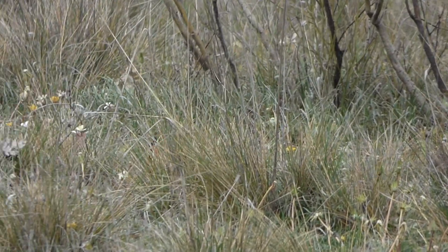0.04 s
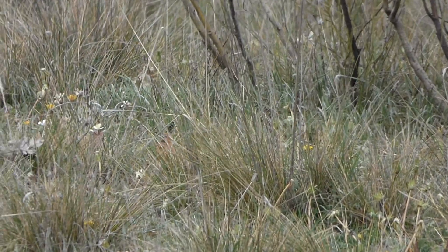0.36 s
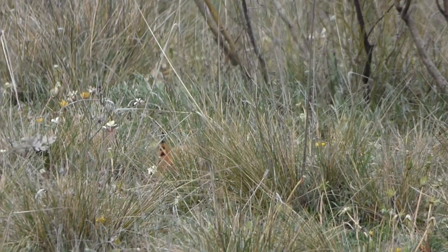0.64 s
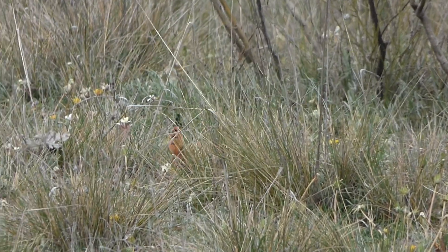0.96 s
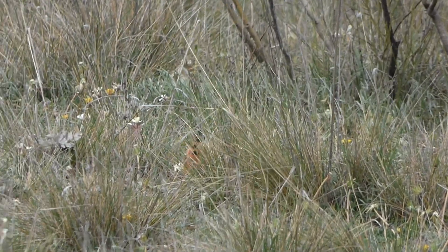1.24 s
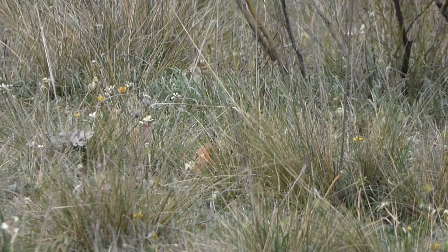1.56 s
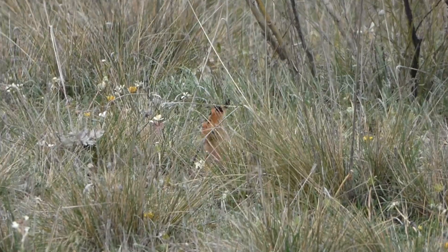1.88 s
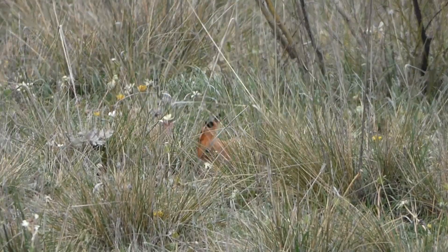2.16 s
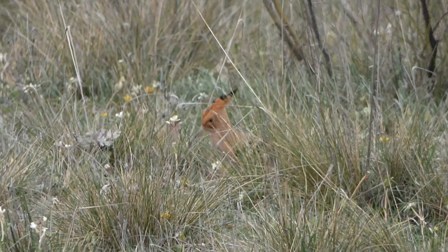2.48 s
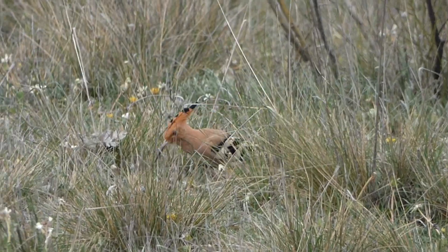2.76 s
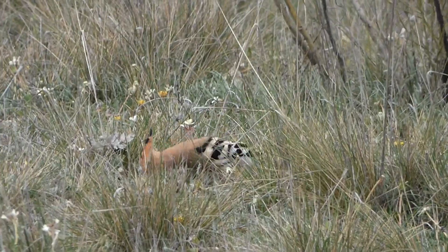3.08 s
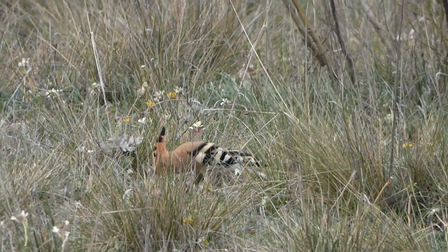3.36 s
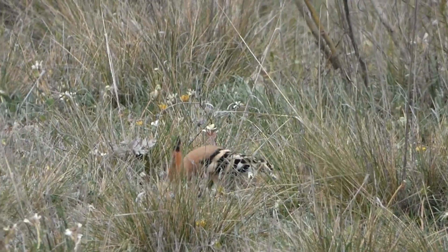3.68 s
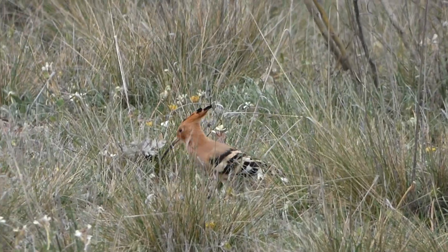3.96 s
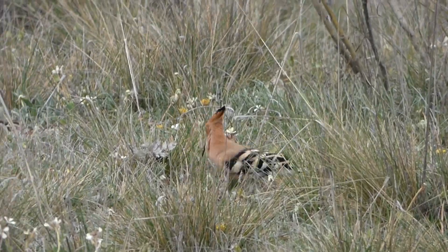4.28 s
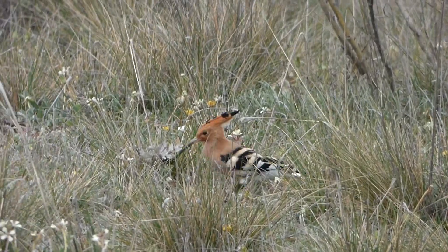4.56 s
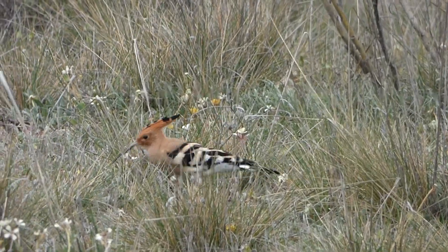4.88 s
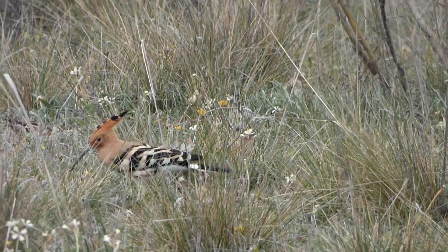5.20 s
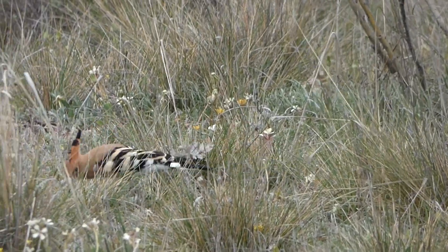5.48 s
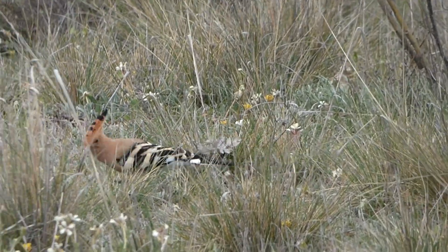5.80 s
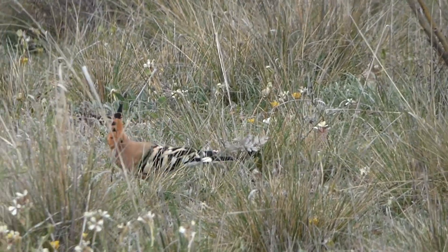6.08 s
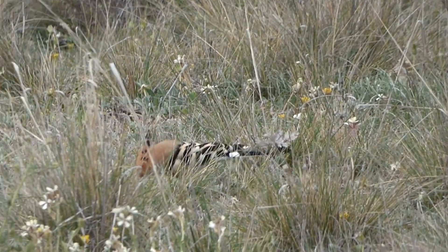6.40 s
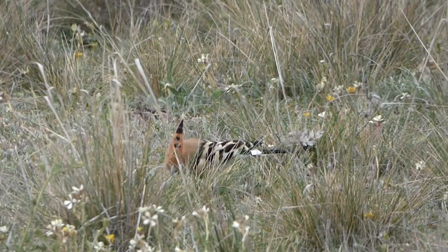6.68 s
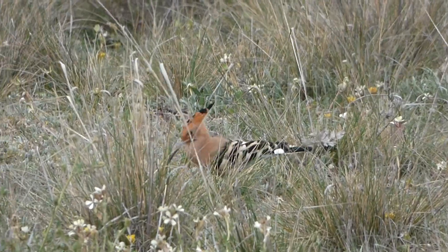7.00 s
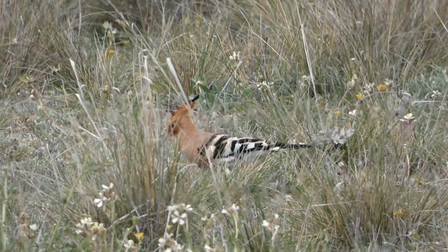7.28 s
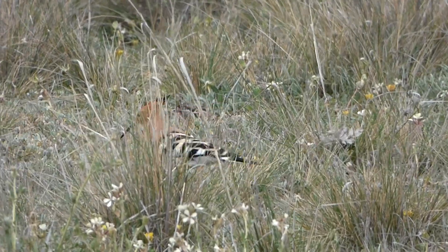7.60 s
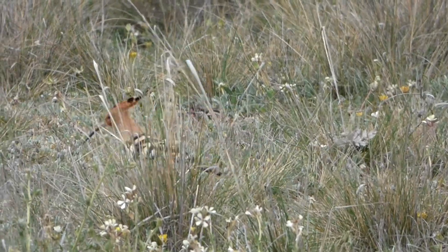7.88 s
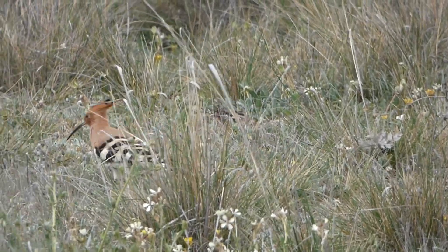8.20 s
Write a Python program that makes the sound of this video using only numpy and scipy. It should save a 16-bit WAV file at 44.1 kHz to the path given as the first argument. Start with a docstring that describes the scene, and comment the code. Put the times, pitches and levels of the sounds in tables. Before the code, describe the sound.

A small songbird hidden in dry grassland gives three quick high chips, a little left of the microphone. Light wind rumbles throughout with a faint fluttering drone, and a distant bird whistles twice, barely audible. About halfway, a faint whine and hum die away as the near bird sings: dry ticks speed up into a buzz, a bright jangle and a run of falling chips. Then the wind carries on.

```python
"""Three chips from a small songbird, hidden to the left of the microphone in dry grassland; later its song:
dry ticks that speed up, a buzz, a jangle from both sides of the syrinx and a run of falling chips.
The syrinx whistles the notes, its membranes slap for the ticks, and grass and scrub scatter the sound.
Light wind rumbles throughout, with a faint fluttering drone; a whine and a hum close by die away
halfway through. Before the song, a second bird slurs twice from across the field."""
import sys
import numpy as np
from scipy import signal
from scipy.fft import rfft, irfft
from scipy.io import wavfile
from scipy.ndimage import uniform_filter1d

SR = 44100
rng = np.random.default_rng(int(sys.argv[2]) if len(sys.argv) > 2 else 0)


def transcribe(signal):
    """Save signal, clipped to [-1, 1], as a 16-bit WAV file at the path in sys.argv[1]."""
    frames = np.atleast_2d(signal).T
    limited = np.clip(frames, -1, 1)
    pcm = np.round(limited * 32767).astype(np.int16)
    wavfile.write(sys.argv[1], SR, pcm)


N = 363825
TIME = np.arange(N) / SR
HZ = np.maximum(np.fft.rfftfreq(N, 1 / SR), 1)


def from_db(db):
    """Decibels to gain."""
    return 10 ** (np.asarray(db) / 20)


def rms_one(x):
    """Scale to unit rms."""
    return x / np.sqrt(np.mean(x ** 2) + 1e-20)


def spectrum(rows):
    """Gain at every frequency, from rows of f/Hz, level/dB."""
    hz, db = np.transpose(rows)
    return from_db(np.interp(np.log(HZ), np.log(hz), db))


def fader(rows):
    """Gain at every sample, from rows of t/s, level/dB."""
    return from_db(np.interp(TIME, *np.transpose(rows)))


def noise(gain):
    """Steady noise with the given gain per frequency; rms 1."""
    return rms_one(irfft(rfft(rng.standard_normal(N)) * gain, N))


def resonance(hz, width_hz):
    """Gain of a resonance with steep skirts."""
    return 1 / (1 + ((HZ - hz) / width_hz) ** 2)


def drift(rate_hz):
    """Random wander, mostly slower than rate_hz; rms 1."""
    return noise(resonance(0, rate_hz))


def add(track, s, sound):
    """Mix a sound into a track at time s."""
    at = max(int(s * SR), 0)
    track[at:at + len(sound)] += sound[:N - at]


def glide(length, places, pitches, rise, fall):
    """One syrinx note: phase along a pitch path, and the swell of the air that drives it."""
    u = np.linspace(0, 1, max(int(length * SR), 8))
    hz = uniform_filter1d(np.interp(u, places, pitches), len(u) // 6, mode="nearest")
    ramp = np.clip(np.minimum(u / rise, (1 - u) / fall), 0, 1)
    phase = 2 * np.pi * (np.cumsum(hz) / SR + rng.random())
    return phase, np.sin(np.pi / 2 * ramp) ** 2


# syllables, shared between the two sides of the syrinx; by name: delay/s, length/s, shape, level/dB
SYLLABLES = {"call": [(0, .023, "chip", 0), (.0378, .008, "peep", -11.5), (.0685, .023, "chip", 1),
             (.1135, .0165, "high chip", -2.5)], "flourish": [(0, .0065, "drop", -4),
             (.007, .004, "flick", -3), (.0108, .0085, "slur", 1), (.0262, .0088, "rise", -1)],
             "buzz": [(0, .0032, "low fall", 0), (.0036, .003, "low fall", -3),
             (.0052, .0036, "low rise", 0), (.0052, .0036, "top rise", -7)],
             "whirr": [(0, .0025, "fall", 0)], "rattle": [(0, .0042, "hook", 0),
             (.003, .005, "low slur", -1.5)], "seesaw": [(0, .0085, "slur", 0),
             (.0052, .005, "high slur", 1)], "jangle": [(0, .004, "slur", -1),
             (.0043, .007, "high fall", 0), (.0043, .0034, "flick", -2), (.0083, .0034, "flick", -2)],
             "chime": [(0, .011, "hold", 0), (.009, .0065, "slur", -2.5)],
             "stutter": [(0, .0075, "slur", 0)], "chip": [(0, .0235, "run chip", 0)]}
def syllable(name, s, db, tuning):
    """The notes of one syllable: t/s, length/s, shape, level/dB, pitch factor."""
    return [(s + delay, length, shape, db + note_db, tuning)
            for delay, length, shape, note_db in SYLLABLES[name]]


# the near bird's single notes: t/s, length/s, shape, level/dB
SINGLE_NOTES = [(0, 0.0098, "slur", -49.5), (0.103, 0.0047, "low fall", -43),
                (.165, 0.008, "low fall", -49), (4.588, 0.0107, "low rise", -32),
                (4.589, 0.0074, "top rise", -34), (4.811, .010, "low slur", -30),
                (4.828, .0065, "rise", -24), (4.922, .010, "slur", -19.5), (5.0168, .010, "slur", -21),
                (5.053, 0.011, "peep", -40.5), (5.107, 0.012, "slur", -27.5), (5.119, 0.012, "hold", -23.5),
                (5.182, 0.0048, "slur", -19), (5.194, 0.011, "slur", -25), (6.023, 0.021, "slur", -49)]
# its syllables sung once: t/s, syllable, level/dB
PHRASES = [(.037, "call", -31), (4.9442, "flourish", -19), (5.0644, "flourish", -22),
           (5.6369, "call", -29.5)]
# its trills: first t/s, last t/s, rate/Hz, syllable, first level/dB, last level/dB, last pitch over first
TRILLS = [(4.5994, 4.7370, 115, "buzz", -31.5, -27.5, 1.11),
          (4.753, 4.8115, 430, "whirr", -35, -28.5, 1.09), (4.8387, 4.9215, 132, "rattle", -28, -23.5, 1),
          (4.985, 5.007, 92, "seesaw", -27.5, -25, 1), (5.1287, 5.1725, 114, "jangle", -26, -23.5, .99),
          (5.206, 5.268, 63, "chime", -21, -22.5, .96), (5.289, 5.3055, 114, "stutter", -29, -26, 1),
          (5.3235, 5.5622, 25, "chip", -29.5, -27, 1.04)]
def song_notes(pitch_scatter=.019, uneven_db=1.5, slowing=.06):
    """Every whistled note; a trill starts a little fast and eases off, no two repeats quite alike."""
    notes = [(*note, 1) for note in SINGLE_NOTES]
    for s, name, db in PHRASES:
        notes += syllable(name, s, db, tuning=.99)
    for first, last, rate, name, first_db, last_db, climb in TRILLS:
        for u in np.linspace(0, 1, round((last - first) * rate) + 1):
            s = first + (last - first) * (u - slowing * u * (1 - u))
            db = first_db + (last_db - first_db) * u + uneven_db * rng.uniform(-1, 1)
            tuning = climb ** u * (1 + pitch_scatter * rng.standard_normal())
            notes += syllable(name, s, db, tuning)
    return notes


# pitch along a note, by shape: onset f/Hz, early f/Hz, late f/Hz, end f/Hz
NOTE_SHAPES = {"chip": (8430, 6700, 5730, 5290), "run chip": (8900, 7100, 6100, 5150),
               "high chip": (9000, 7960, 6720, 7000), "peep": (4450, 4400, 4580, 4820),
               "slur": (6056, 5710, 5370, 5280), "low slur": (5780, 5344, 5186, 5150),
               "high slur": (8300, 7600, 7130, 6800), "hold": (7560, 7700, 7294, 7250),
               "drop": (8150, 6660, 5350, 5300), "high fall": (7760, 7250, 6300, 6050),
               "fall": (6300, 5580, 4640, 4500), "low fall": (5750, 5270, 4530, 4060),
               "low rise": (3770, 3950, 4230, 4650), "top rise": (7300, 7370, 8900, 9540),
               "rise": (6600, 7160, 7950, 9300), "hook": (5170, 6950, 7600, 7500),
               "flick": (5100, 6100, 7500, 7600)}
# the shapes sung in the low register; all others are in the high one
LOW_REGISTER = ("peep", "fall", "low fall", "low rise")
def syrinx(shortest_edge_s=.001):
    """Each note is a whistle that slides in, holds a body and slides out. Two tracks: low, high register."""
    registers = np.zeros((2, N), complex)
    for s, length, shape, db, tuning in song_notes():
        edge = max(.18, shortest_edge_s / length)
        pitches = tuning * np.array(NOTE_SHAPES[shape])
        phase, swell = glide(length, [0, .22, .78, 1], pitches, rise=edge, fall=edge)
        track = registers[0 if shape in LOW_REGISTER else 1]
        add(track, s, from_db(db) * swell * np.exp(1j * phase))
    return registers


# harshness of the voice: t/s, rasp/0-1
RASP = [(.13, 0.1), (.16, 0.17), (4.6, 0.3), (4.9, 0.74), (4.96, 0.47), (5.11, .46), (5.15, 0.61),
        (5.27, 0.5), (5.39, 0.33), (5.45, 0.17)]
# colour of its sizzle: f/Hz, level/dB
SIZZLE_COLOUR = [(3500, -48.5), (5000, -12), (7000, 7.5), (8800, -5), (10300, -4), (13000, 0), (15800, -18)]
# tone colour of the song at the microphone, with dips from the ground reflection: f/Hz, level/dB
SONG_COLOUR = [(2200, -39.5), (3200, -14.5), (5500, -2), (6500, -5.5), (7400, -4), (9000, -2.5),
               (10500, -18), (13000, -7), (15500, -31.5)]
def near_bird(octave_db=-19, clear_boost_db=11, sizzle_db=-15.5, register_edges_hz=(3700, 4450)):
    """Both sides of the syrinx share an airway, adding octaves and sum tones; rasp frays them to a sizzle."""
    rasp = np.clip(np.interp(TIME, *np.transpose(RASP)), 0, 1)
    shake = from_db(2.1 * rasp * drift(450)) * np.exp(.42j * rasp * drift(600))
    registers = syrinx() * shake
    voice = registers.sum(axis=0)
    fray = np.exp(.9j * rasp * drift(900))
    overtone_gain = from_db(octave_db + clear_boost_db * (1 - rasp) ** 2)
    overtones = overtone_gain * fray * voice ** 2 / (np.abs(voice) + 1e-9)
    sizzle = from_db(sizzle_db) * rasp ** 1.5 * np.abs(voice) * noise(spectrum(SIZZLE_COLOUR))
    # each register has a firm lower edge
    whistles = sum(signal.sosfilt(signal.butter(8, edge_hz, "high", fs=SR, output="sos"), track)
                   for track, edge_hz in zip(registers, register_edges_hz))
    song = (whistles + overtones).real + ticks()
    return irfft(rfft(song) * spectrum(SONG_COLOUR), N) + sizzle


# first echoes, off the ground and the nearest stems: delay/s, left level/dB, right level/dB
BOUNCES = [(.00055, -24.5, -19.5), (.0017, -16.5, -21.5), (.0029, -22.5, -12), (.0042, -11, -20.5)]
def scrub(song, left_db=2.6, right_lag_s=.3 / SR,
          grass_db=-10, grass_t60_s=.085, bushes_db=-21, bushes_t60_s=.22):
    """Direct sound from the left, a few bounces, then dense echoes from grass and bushes farther off."""
    t = TIME[:SR // 2]
    channels = []
    for channel, (side_db, lag) in enumerate(((left_db, 0), (-left_db, right_lag_s))):
        paths = 1 + sum(from_db(db[channel]) * np.exp(-2j * np.pi * HZ * delay) for delay, *db in BOUNCES)
        early = irfft(rfft(song) * paths * np.exp(-2j * np.pi * HZ * lag), N)
        echoes = 0
        for db, t60 in ((grass_db, grass_t60_s), (bushes_db, bushes_t60_s)):
            tail = rng.standard_normal(len(t)) * np.exp(-np.log(1000) * t / t60) * (t > .001)
            echoes = echoes + from_db(db) * tail / np.linalg.norm(tail)
        channels.append(from_db(side_db) * early + signal.fftconvolve(song, echoes)[:N])
    return np.array(channels)


# colour of the wind at the microphone, mid and side: f/Hz, relative level/dB
WIND_MID = [(12, -51), (20, -15), (104, -14), (158, -8), (308, -12), (419, -6), (713, -11.5), (797, -9.5),
            (891, -17), (969, -18), (1320, -20), (1510, -20.5), (1890, -27), (4500, -31.5), (15800, -34.5)]
WIND_SIDE = [(12, -48.5), (20, -12.5), (104, -18), (308, -15.5), (419, -19.5), (539, -6), (637, -5.5),
             (866, -9), (942, 0.5), (1110, -11), (1390, -10), (1650, -18), (2430, -25), (13400, -34),
             (15800, -37.5)]
def wind(mid_db=-61, side_db=-62.5):
    """Light wind over the grassland: a soft, even rumble that thins out into hiss."""
    mid = from_db(mid_db) * noise(spectrum(WIND_MID))
    side = from_db(side_db) * noise(spectrum(WIND_SIDE))
    return np.array([mid + side, mid - side])


# resonances of the drone: f/Hz, width/Hz, mid level/dB, side level/dB
DRONE_BANDS = [(365, 39, -71.5, -80), (426.3, 24.7, -63, -79.5), (503.5, 30.7, -71.5, -78.5),
               (814.5, 38, -70, -71.5), (984, 100, -70.5, -74.5), (1161, 24, -77.5, -71),
               (1485, 70.6, -75.5, -78), (2084, 220, -82, -87)]
# its slow rise and fall: t/s, level/dB
DRONE_LEVEL = [(0, 3), (1, -0.5), (2.2, 1), (3.4, -2), (4.1, .5), (5.5, 1.5), (6.7, 0.5), (8.25, 0)]
# soft bumps, dead centre: t/s, length/s, f/Hz, level/dB
BUMPS = [(0.354, 0.032, 846, -56), (0.779, 0.01, 450, -57), (0.992, 0.036, 427, -55.5),
         (2.265, 0.17, 95, -74.5), (2.776, 0.029, 820, -57.5), (4.882, 0.098, 423, -57.5),
         (5.477, 0.043, 420, -58.5), (6.088, 0.042, 421, -56), (7.412, 0.057, 424.4, -54)]
def drone(flutter_db=4.5, sway_db=.67):
    """A faint drone: narrow resonances flutter together, with a soft bump now and then."""
    sway = sway_db * drift(6)
    flutter = flutter_db * 2 * np.tanh(drift(27.8) / 2)
    strength = fader(DRONE_LEVEL) * rms_one(from_db(sway + flutter))
    mid = strength * sum(from_db(db) * noise(resonance(hz, width)) for hz, width, db, _ in DRONE_BANDS)
    side = strength * sum(from_db(db) * noise(resonance(hz, width)) for hz, width, _, db in DRONE_BANDS)
    for s, length, hz, db in BUMPS:
        size = int(length * SR)
        bump = noise(resonance(hz, hz / 5))[:size] * np.hanning(size)
        add(mid, s, from_db(db) * rms_one(bump))
    return np.array([mid + side, mid - side])


# a thin whine in the centre, swelling just before it stops: t/s, level/dB
WHINE_LEVEL = [(0, -71), (2.3, -69.5), (2.7, -66), (3.5, -68.5), (3.74, -58.5), (3.84, -98)]
# a soft hum, left of centre: t/s, level/dB
HUM_LEVEL = [(0, -65), (3.6, -65), (4.8, -73), (8.25, -91)]
def motor(whine_hz=799, pulse_s=.12, crest_s=3.75, pulse_depth=.93, waver_rad=.9,
          hum_hz=512, hum_width_hz=140, hum_left_db=4):
    """An evenly pulsing whine and a hum, as of a small motor near the microphone; both die away halfway."""
    pulse = 1 + pulse_depth * np.cos(2 * np.pi * (TIME - crest_s) / pulse_s)
    tone = np.sin(2 * np.pi * whine_hz * TIME + waver_rad * drift(12))
    whine = fader(WHINE_LEVEL) * rms_one(pulse * tone)
    hum = fader(HUM_LEVEL) * noise(resonance(hum_hz, hum_width_hz))
    return whine + hum * from_db([[hum_left_db], [-hum_left_db]])


# whistles from across the field: t/s, length/s, start f/Hz, middle f/Hz, end f/Hz, level/dB
FAR_NOTES = [(1.883, .075, 3500, 3950, 4300, -70.5), (1.963, .06, 4200, 4000, 3700, -76)]
def far_bird(blur_rad=.8):
    """Two faint slurs from a distant bird, blurred on their way to the microphone."""
    slurs = np.zeros(N, complex)
    for s, length, *pitches, db in FAR_NOTES:
        phase, swell = glide(length, [0, .5, 1], pitches, rise=.3, fall=.27)
        add(slurs, s, from_db(db) * swell * np.exp(1j * phase))
    return (slurs * np.exp(1j * blur_rad * drift(120))).real


# the near bird's ticks, each a pair of flicks: t/s, level/dB, fundamental level/dB, syrinx tension/0-1
TICKS = [(3.600, -57, 8, 0), (3.837, -56, 16, 0), (4.027, -44.5, 16, 0.12), (4.179, -38, 4, 0.02),
         (4.2975, -33, 5.5, .92), (4.3991, -30, 2, 0.97), (4.4976, -34, 7, 0.97), (4.5287, -33.5, 5.5, 1),
         (4.5593, -33, 5.5, 1)]
# overtones of a flick: multiple, level/dB
TICK_OVERTONES = [(2, 2), (3, -1), (4, 5.5)]
# flicks of a slack and of a tense syrinx: length/s, spacing/s, start f/Hz, end f/Hz
SLACK_TICK = (.0098, .0115, 2430, 3700)
TENSE_TICK = (0.0049, .0034, 3620, 5200)
def ticks(first_db=-2.5, lead_db=-13, pitch_scatter=.024, top_hz=11500,
          wobble_rad=.43, slack_dull_db=3, slack_calm=.44):
    """The membranes slap together while the pitch flicks upward, so overtones are strong.
    Tension makes a tick shorter, higher and rougher; a slack one is led in by a soft extra flick."""
    track = np.zeros(N)
    wobble = wobble_rad * drift(870)
    for s, db, fundamental_db, tension in TICKS:
        slack = np.clip(1 - tension, 0, 1)
        length, gap, *pitches = slack * np.array(SLACK_TICK) + (1 - slack) * np.array(TENSE_TICK)
        for delay, gain in ((-gap, slack * from_db(lead_db)), (0, from_db(first_db)), (gap, 1)):
            tuning = 1 + pitch_scatter * rng.standard_normal()
            phase, swell = glide(length, [0, 1], np.array(pitches) * tuning, rise=.5, fall=.2)
            start = int((s + delay) * SR)
            phase += (1 - slack_calm * slack) * wobble[start:start + len(phase)]
            tone = from_db(fundamental_db) * np.sin(phase)
            for k, overtone_db in TICK_OVERTONES:
                tone += from_db(overtone_db - slack_dull_db * slack * (k - 2)) * np.sin(k * phase)
            add(track, s + delay, gain * from_db(db) * swell * tone)
    return signal.sosfilt(signal.butter(2, top_hz, fs=SR, output="sos"), track)


def scene():
    """At the microphone: the bird in the scrub, another far off, and wind, drone and motor beneath."""
    return scrub(near_bird()) + far_bird() + wind() + drone() + motor()


def record(dry):
    """The top is cut steeply."""
    cutoff_hz = 15800
    return irfft(rfft(dry) / np.sqrt(1 + (HZ / cutoff_hz) ** 600), N)


dry = scene()
out = record(dry)
transcribe(out)
```